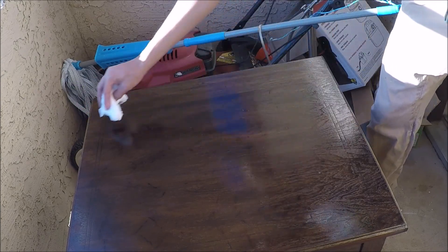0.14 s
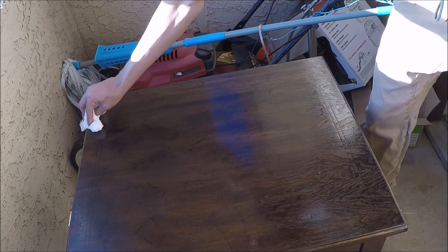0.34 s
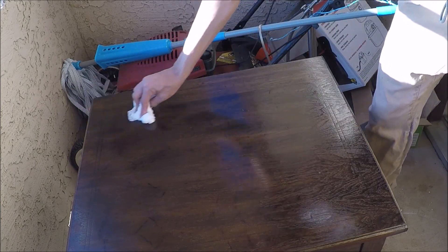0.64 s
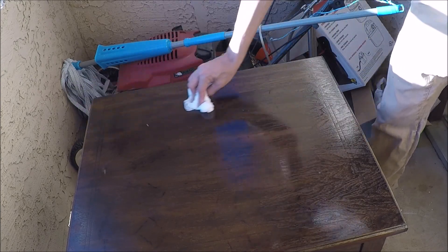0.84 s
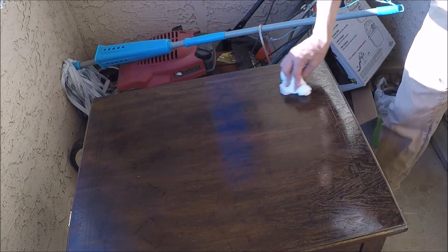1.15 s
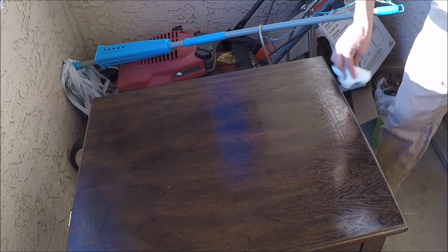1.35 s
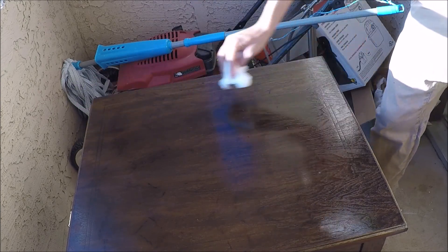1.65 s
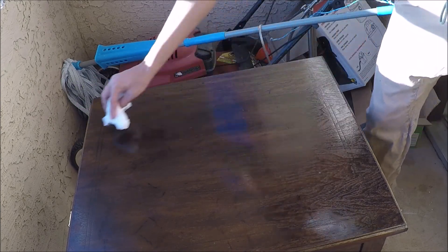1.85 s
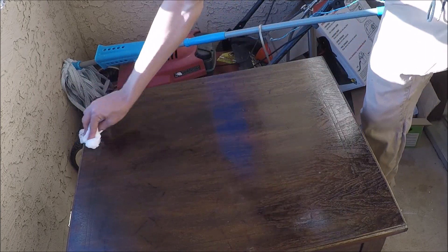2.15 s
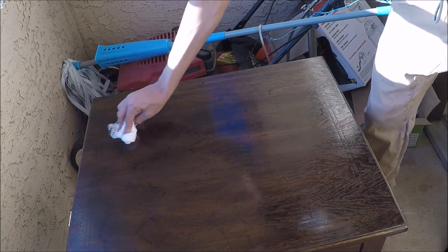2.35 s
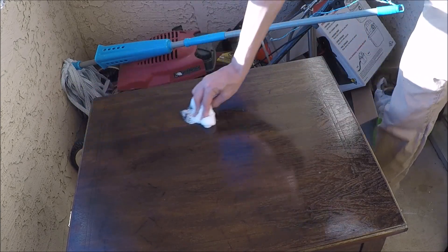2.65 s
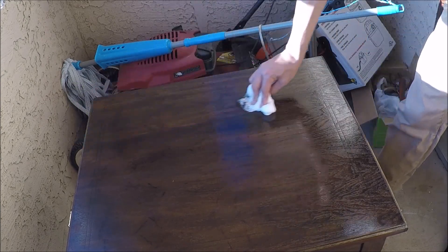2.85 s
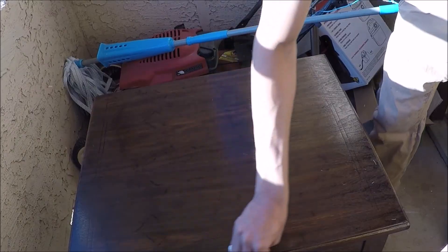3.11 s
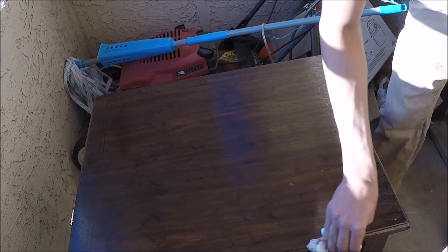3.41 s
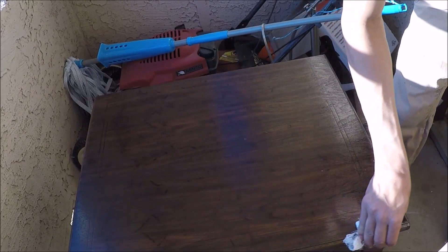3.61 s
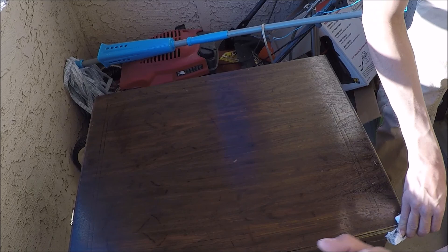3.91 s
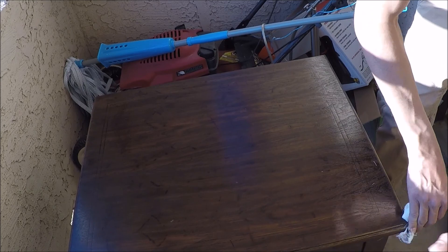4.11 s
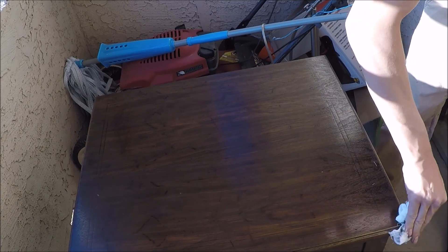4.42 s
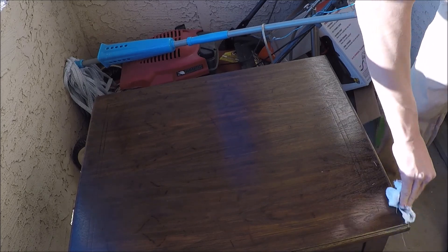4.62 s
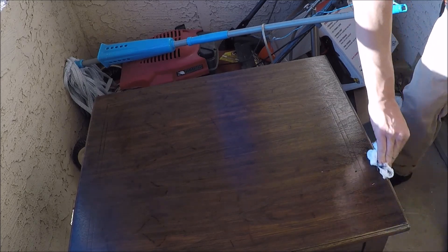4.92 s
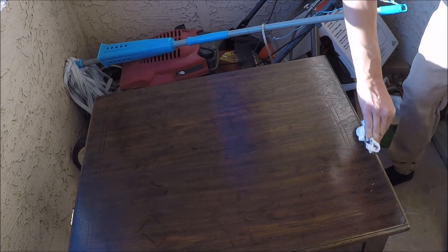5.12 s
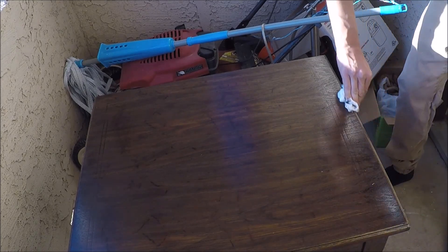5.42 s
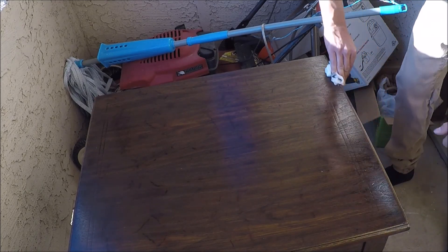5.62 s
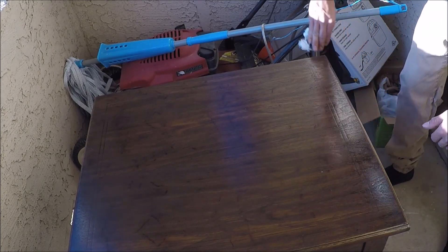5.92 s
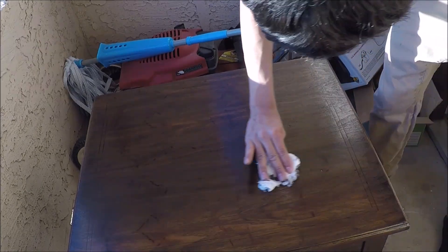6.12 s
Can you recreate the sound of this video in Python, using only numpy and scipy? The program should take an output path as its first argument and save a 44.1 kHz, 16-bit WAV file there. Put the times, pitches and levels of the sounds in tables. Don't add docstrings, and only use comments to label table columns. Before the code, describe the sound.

Breathy rag wipes and dull wooden thumps on a patio table, over a strong low hum that drops out and comes back.

```python
import sys
import numpy as np
from scipy import signal
from scipy.io import wavfile
from scipy.ndimage import uniform_filter1d

SR = 44100
rng = np.random.default_rng(int(sys.argv[2]) if len(sys.argv) > 2 else 0)


def digitize_waveform(pressure):
    field = np.atleast_2d(pressure).T
    bounded = np.clip(field, -1, 1)
    quanta = np.round(bounded * 32767).astype(np.int16)
    wavfile.write(sys.argv[1], SR, quanta)


def volts(x):
    e = np.asarray(x, float) / 20
    return 10 ** e


N = 276001
T = np.arange(N) / SR

CUTS = [2.91993, 6.05719]
SHOT = np.searchsorted(CUTS, T)

# cloth lands and lifts in seconds, hiss and table ring in dB, pressure build in seconds.
STROKES = [
    (0.417, 1.414, -48.5, -63.5, 0.073),
    (1.406, 1.57, -65, -69, .02),
    (2.166, 2.939, -48.5, -53, 0.26),
    (2.983, 4.057, -60, -51.5, 0.25),
    (4.035, 4.553, -80, -51.5, 0.042),
    (4.534, 5.939, -49.5, -47.5, 1),
    (5.905, 6.06, -66, -68, .02),
    (6.033, 6.26, -60.5, -69, 0.016),
]
# frequency in Hz, level in dB per Hz.
RAG_COLOUR = [(710, -17.5), (1200, 1), (1590, -12.5), (1750, -3), (2540, -6.5), (3350, -6), (5150, -6),
              (6170, -3.5), (7090, -1.5), (9990, -10.5), (11400, -19.5), (13300, -16.5), (15500, -45.5)]
# frequency in Hz, level in dB per Hz.
EDGE_COLOUR = [(1060, -35), (1800, -1), (1880, -9), (1930, -1), (2040, 0), (3350, -9), (4160, -5),
               (7400, -6.5), (8790, -20), (13400, -46), (15500, -44)]
# frequency in Hz, left-right likeness from 0 to 1.
RAG_SAME = [(1500, 0.086), (2500, 0.18), (3600, 0.9), (5200, 0.14), (6800, 0.033), (15000, .1)]
# start and length in seconds, pitch and width in Hz, level in dB.
SCUFFS = [
    (1.376, 0.043, 890, 900, -46),
    (4.233, .03, 3570, 700, -57.5),
    (4.233, 0.038, 5760, 2500, -61),
    (4.47, .02, 4000, 800, -63),
]

# start in seconds, strength in dB, rise and push length in seconds,
# brightness in dB an octave.
KNOCKS = [(1.295, -34, 0.01, 0.0062, 3), (1.375, -18, .001, 0.002, 6.5), (1.383, -10.5, 0.0038, 0.013, 1.5),
          (1.44, -17.5, 0.0057, 0.0023, -2), (1.485, -25, 0.0072, 0.011, -3),
          (1.56, -33.5, 0.0088, 0.0045, -5.5), (2.34, -25, .01, 0.062, 9.5),
          (3.165, -23.5, 0.0035, 0.0018, -5.5), (3.47, -23.5, 0.015, 0.015, 4.5),
          (3.63, -20, 0.014, 0.021, -3), (3.665, -14, 0.026, 0.0066, -2), (3.72, -25.5, 0.013, 0.0036, 2),
          (3.85, -22, 0.0035, 0.0047, 4), (5.03, -33.5, 0.014, 0.043, -10.5),
          (1.413, -13, 0.0026, 0.0033, 1.5)]
# start in seconds, strength in dB, rise and push length in seconds,
# brightness in dB an octave.
SLAPS = [
    (6.162, -10.5, 0.0012, 0.0026, 4.5),
    (6.168, -12, 0.0039, 0.003, -8),
]
# pitch and width in Hz, left and right level in dB.
TABLE_MODES = [(37.1, 11, 5.5, -17), (90.7, 5.6, 5.5, -17.5), (120, 5.2, -6, -15), (143.5, 7.2, 4.5, -38),
               (160, 8.9, 2, -33), (203.7, 10.6, 5, -32.5), (234.6, 13, -8.5, -16), (302.4, 28, -13, -28),
               (387.6, 12.8, -8.5, -33), (449.6, 23, -13, -24.5), (560, 34, -21.5, -21),
               (837, 38, -20.5, -29), (1001, 40, -41, -31.5), (1030, 40, -37, -40), (1390, 26, -46, -33),
               (1600, 80, -41, -40)]
# pitch and width in Hz, left and right level in dB.
MIDDLE_MODES = [(94.2, 10.8, 3, -30), (151.3, 4.6, -9.5, -28), (193, 6.9, 0.5, -33), (235.7, 7.3, -7, -29),
                (358, 33, -8, -21), (453, 19, -13.5, -20), (537, 16, -22, -31), (657, 23, -41, -33),
                (726, 29, -28, -30), (818, 16, -23.5, -25.5), (970, 19, -29, -28.5), (1140, 30, -40, -48),
                (1290, 25, -47, -42)]

# moment in seconds, phase then in turns.
HUM_PHASE = [(2.91993, -.365), (6.05719, -.38), (6.05719, -.27)]
HUM_DB = [-10.5, -11, -13.5]
# centre in seconds, hum change in dB, half width in seconds.
HUM_ROCKS = [
    (1.41, -3, 0.037),
    (1.485, -23, 0.046),
    (1.59, -7.5, 0.036),
    (1.85, -1.5, 0.34),
    (3.6, -4, 0.047),
    (3.7, 12, 0.051),
    (3.835, -22, 0.049),
    (6.09, -12, 0.027),
    (6.2, -13.5, 0.076),
]

# start and end in seconds, firing rate at start and end in Hz, level in dB.
GEARS = [
    (3.2, 4.03, 101.5, 110, -53),
    (4.65, 6.2, 121.5, 148.1, -46),
]
# multiple of the firing rate, level in dB.
GEAR_ORDERS = [
    [(2, -4), (3, 0.5), (4, -.5)],
    [(2, .5), (3, -.5)],
]
GEAR_BEND = [.72, 1.08]
# time in seconds, pitch in Hz, level in dB.
FAN = [(0, 157.6, -57), (2.899, 151, -66), (3, 171.2, -47), (4, 159.5, -37), (4.8, 170.2, -39.5),
       (5.499, 160, -44), (6.26, 160, -37.5)]

# time in seconds, tyre roar in dB.
TRAFFIC = [
    [(0, -51.5), (1.27, -49), (1.39, -49), (1.52, -54), (1.9, -53), (2.54, -49.5), (2.92, -46)],
    [(2.92, -60), (3.24, -56), (3.74, -48), (5.2, -47), (5.54, -45.5), (6.06, -45)],
    [(6.06, -56), (6.26, -63)],
]
# frequency in Hz, level in dB per Hz.
ROAR_COLOUR = [(260, -71.5), (450, -8.5), (573, -6.5), (603, -9), (791, -2.5), (866, -8.5), (958, -5),
               (1270, -11), (1550, -13), (2230, -20), (5000, -39.5), (6500, -77), (11000, -120)]
# frequency in Hz, level in dB per Hz.
LOW_COLOUR = [(20, 1), (45, 9), (90, -3), (160, -8), (250, -6.5), (400, -15.5), (600, -24), (900, -52)]
# frequency in Hz, level in dB per Hz.
SHAKE_COLOUR = [(15, 12.5), (30, 16), (47, -32.5), (70, -0.5), (92, 3.5), (120, 0.5), (160, -4), (220, -13),
                (400, -24), (700, -65)]
# frequency in Hz, left-right likeness from 0 to 1.
YARD_SAME = [(60, 1), (290, 0.95), (640, 0.35), (1100, 0.043), (1600, 0.098), (5000, .1)]
LOW_DB = [-49.5, -44.5, -47]
SHAKE_DB = [-42, -38.5, -42.5]
# centre in seconds, shake change in dB, half width in seconds.
JOLTS = [
    (1.35, -2, 0.4),
    (2.54, 4.5, 0.32),
    (3.08, 12, 0.34),
    (3.86, 2.5, 0.22),
    (4.21, 2.5, 0.15),
    (4.85, 3, 0.81),
    (5.54, -3, 0.15),
    (6.095, 16.5, .045),
]
# start and length in seconds, start and end pitch in Hz, level in dB.
CHIRPS = [
    (3.595, .025, 2250, 2850, -59),
    (3.61, .04, 2880, 2720, -56),
    (3.602, .02, 2150, 2150, -58),
    (3.628, .024, 2450, 2400, -52),
    (3.642, .02, 2350, 2200, -59),
    (3.655, .022, 2300, 2600, -59),
    (3.67, .055, 2480, 2050, -58),
    (4.345, .035, 2300, 2850, -63),
    (4.363, .02, 2850, 2800, -57),
    (4.375, .03, 2900, 3700, -62),
]

# frequency in Hz, level in dB per Hz.
MIC_HISS = [(1180, -30), (2000, -19.5), (2230, -30.5), (2970, -12), (4530, -8.5), (9510, 2.5), (12300, -10),
            (13300, -30.5), (15000, -18)]
# frequency in Hz, level against the right in dB.
LEFT_PORT = [(5500, 0.5), (6500, 2), (7500, 0), (8500, -4.5), (9500, -8), (10500, 0.5), (12000, -1.5),
             (14000, -1)]
# frequency in Hz, phase against the right in radians.
LEFT_LAG = [(90, -0.17), (300, -0.9), (750, -0.82), (1500, -1.04), (2500, -0.84), (3700, 0.57), (6800, 0.8),
            (9000, 0.73)]
# frequency in Hz, share dropped from 0 to 1.
SPARSE_TOP = [(9000, 0), (10000, .06), (11000, .22), (12000, .38), (13500, .55), (14300, .75), (15000, .93),
              (15400, 1)]
# frequency in Hz, level in dB.
FAINTEST = [(9000, -160), (11000, -125), (12500, -108), (13000, -101), (14500, -99), (15300, -81)]


def rag():
    rub, ring = strokes()
    flat = noise(RAG_COLOUR, RAG_SAME, patchy_db=1.0, size=512)
    edge = noise(EDGE_COLOUR, RAG_SAME, patchy_db=2.0, size=512) * volts(-1.0)
    on_edge = (T > CUTS[0]) & (T < 4.15)
    hiss = np.where(on_edge, edge, flat) * rub * volts(np.array([[3.5], [3.7]]))
    top = resonate(rng.standard_normal(N), hz=396.6, width=17)
    top = evened(resonate(top, hz=406, width=56))
    return hiss + top * ring * volts(np.array([[8.], [-6.]]))


def strokes():
    land_s, lift_s = 0.034, 0.043
    light_db, tire_db, tire_s = -9.5, -2.5, 0.16
    hiss, ring = volts(-68) ** 2, volts(-76) ** 2
    for start, end, hiss_db, ring_db, build_s in STROKES:
        touch = np.clip((T - start) / land_s, 0, 1) * np.clip((end - T) / lift_s, 0, 1)
        press_db = light_db * np.exp(-abs(T - start) / build_s)
        press_db += tire_db * np.exp(-abs(end - T) / tire_s)
        hiss = hiss + (touch * volts(hiss_db + press_db)) ** 2
        ring = ring + (touch * volts(ring_db + press_db)) ** 2
    return np.sqrt(hiss), np.sqrt(ring)


def scuffs():
    return whistles([(s, length, hz, hz, width, db) for s, length, hz, width, db in SCUFFS])


def knocks(events, modes):
    out, t = np.zeros((2, N + SR)), T[:SR // 2]
    chance = rng.uniform(-0.72, 1, (len(events), len(modes), 3))
    lag = np.array([[0], [2.4]])
    for (s, db, rise, last, tilt_db), rows in zip(events, chance):
        start = round(s * SR)
        push = np.sin(np.pi / 2 * np.minimum(t / rise, 1)) ** 2
        push *= np.exp(-np.maximum(t - rise, 0) / last)
        push /= push.sum()
        for (hz, width, left_db, right_db), (turn, detune, spread) in zip(modes, rows):
            swell = signal.lfilter([1], [1, -np.exp(-np.pi * width / SR)], push)
            mode = swell * np.cos(2 * np.pi * hz * (1 + 0.014 * detune) * t + np.pi * turn + lag)
            level_db = db + np.array([[left_db], [right_db]])
            level_db = level_db + tilt_db * np.log2(hz / 200) + 2.7 * spread
            out[:, start:start + len(t)] += volts(level_db) * mode
    return out[:, :N]


def hum():
    pitch_hz, wobble_db, wobble_s = 59.18, .9, .06
    slack_db = -17.5 * (SHOT == 1) * np.exp(-np.maximum(T - 3.41, 0) / 0.59)
    level_db = np.take(HUM_DB, SHOT) + slack_db + bumps(HUM_ROCKS)
    span = round(wobble_s * SR)
    wobble = uniform_filter1d(uniform_filter1d(rng.standard_normal(N), span), span)
    level_db = level_db + wobble_db * evened(wobble)
    s, turns = np.transpose(HUM_PHASE)[:, SHOT]
    tone = np.sqrt(2) * volts(level_db) * np.cos(2 * np.pi * (pitch_hz * (T - s) + turns))
    return tone * volts(np.array([[0], [-36]]))


def vehicle():
    fade_s, grows_db = .16, 4
    out = np.zeros(N)
    for (start, end, hz0, hz1, db), bend, orders in zip(GEARS, GEAR_BEND, GEAR_ORDERS):
        u = np.clip((T - start) / (end - start), 0, 1)
        hz = hz0 + (hz1 - hz0) * u ** bend
        fade = np.clip(np.minimum(T - start, end - T) / fade_s, 0, 1)
        on = volts(db + grows_db * (u - .5)) * fade * (SHOT == 1)
        for k, order_db in orders:
            line = np.sqrt(2) * np.cos(2 * np.pi * k * np.cumsum(hz) / SR)
            blur = evened(resonate(rng.standard_normal(N), k * hz, width=1.0))
            out += on * volts(order_db) * (1.2 * line + .4 * blur)
    return out * volts(np.array([[1.5], [-.7]]))


def fan():
    s, hz, db = np.transpose(FAN)
    drone = evened(resonate(rng.standard_normal(N), np.interp(T, s, hz), width=4.4))
    return volts(np.interp(T, s, db)) * drone * volts(np.array([[1.5], [-.7]]))


def chirps():
    return whistles([(s, length, hz0, hz1, 180, db) for s, length, hz0, hz1, db in CHIRPS])


def yard():
    curves = [np.interp(T, *np.transpose(rows)) for rows in TRAFFIC]
    roar_db = np.choose(SHOT, curves)
    low_db = np.take(LOW_DB, SHOT) + 0.72 * (roar_db + 49.5)
    shake_db = np.take(SHAKE_DB, SHOT) + bumps(JOLTS)
    roar = noise(ROAR_COLOUR, YARD_SAME, patchy_db=1.5, size=1024) * volts(roar_db + np.array([[4.5], [3.5]]))
    low = noise(LOW_COLOUR, YARD_SAME, patchy_db=0.5, size=4096) * volts(low_db + np.array([[13.], [12.]]))
    shake = noise(SHAKE_COLOUR, YARD_SAME, patchy_db=-0.5, size=4096)[0]
    return roar + low + shake * volts(shake_db + np.array([[11.], [-20.]]))


def microphone_hiss():
    return noise(MIC_HISS, [(100, .03), (9000, .03)], patchy_db=-3.5, size=512) * volts(-70 + 2.0)


def whistles(rows):
    out = np.zeros(N)
    for s, length, hz0, hz1, width, db in rows:
        n = round(length * SR)
        hz = np.linspace(hz0, hz1, n)
        air = resonate(resonate(rng.standard_normal(n), hz, width), hz, width)
        out[round(s * SR):][:n] += volts(db + 2.0) * evened(air) * np.hanning(n)
    return out


def noise(colour, same, patchy_db, size):
    hz = np.fft.rfftfreq(size, 1 / SR)
    a, b, c, d, patches = rng.standard_normal((4 * N // size + 6, len(hz), 5)).T
    patches = uniform_filter1d(uniform_filter1d(patches, size=9, axis=0), size=9, axis=1)
    like = np.clip(read(same, hz), -1, 1)[:, None]
    shared, own = a + 1j * b, c + 1j * d
    port = volts(read(LEFT_PORT, hz)) * np.exp(1j * read(LEFT_LAG, hz))
    z = np.array([shared * port[:, None], like * shared + np.sqrt(1 - like ** 2) * own])
    z *= volts(read(colour, hz)[:, None] + patchy_db * evened(patches))
    return evened(signal.istft(z, nperseg=size, noverlap=3 * size // 4)[1][:, :N])


def resonate(x, hz, width):
    turn = np.exp(2j * np.pi * np.cumsum(hz * np.ones(len(x))) / SR)
    r = np.exp(-np.pi * width / SR)
    return 2 * (turn * signal.lfilter([1 - r], [1, -r], x / turn)).real


def bumps(rows):
    total = np.zeros(N)
    for s, db, half in rows:
        total += db * np.maximum(1 - abs(T - s) / half, 0) * (SHOT == np.searchsorted(CUTS, s))
    return total


def read(points, hz):
    f, value = np.transpose(points)
    return np.interp(np.log(hz + 1), np.log(f + 1), value)


def evened(x):
    return x / np.sqrt(np.mean(x ** 2) + 1e-20)


def scene():
    table = rag() + scuffs() + knocks(KNOCKS, TABLE_MODES) + knocks(SLAPS, MIDDLE_MODES)
    return table + hum() + vehicle() + fan() + chirps() + yard()


def fade_left_back(left, right):
    since = np.maximum(T - 3.41, 0)
    share = np.where(SHOT == 1, np.maximum(since / (since + .19), .006), 1)
    return np.array([share * left + (1 - share) * right, right])


def thin_treble(heard):
    hz, t, z = signal.stft(heard, SR, nperseg=2048, noverlap=1024, window="cosine")
    power = uniform_filter1d(abs(z) ** 2, size=8, axis=1)
    luck = rng.random((len(t), len(hz) // 8 + 1))
    luck = np.repeat(luck, 8, axis=1)[:, :len(hz)].T
    busy_db = 10 * np.log10(power[:, 230:420].mean((0, 1)) + 1e-20)
    busy = np.clip(.5 + (busy_db - np.median(busy_db)) / 8, .25, 1)
    lucky = luck > read(SPARSE_TOP, hz)[:, None] ** (1 / busy)
    loud_enough = power > volts(2 * read(FAINTEST, hz))[:, None]
    click = power[:, 720:760].mean(1, keepdims=True) > volts(-184)
    kept = (lucky & loud_enough) | click
    return signal.istft(z * kept, SR, nperseg=2048, noverlap=1024, window="cosine")[1][:, :N]


def top_cut(x):
    return signal.sosfilt(signal.butter(12, 15690, fs=SR, output="sos"), x)


def record(dry):
    left, right = dry + microphone_hiss()
    heard = fade_left_back(left, right)
    heard /= (1 + (heard / .92) ** 6) ** (1 / 6)
    finished = thin_treble(heard)
    return top_cut(finished)


dry = scene()
out = record(dry)
digitize_waveform(out)
```